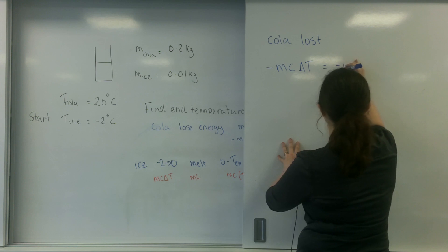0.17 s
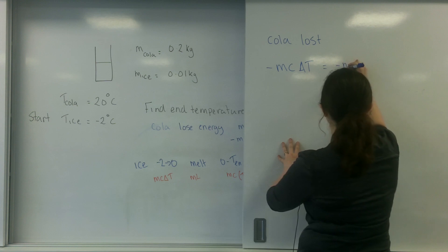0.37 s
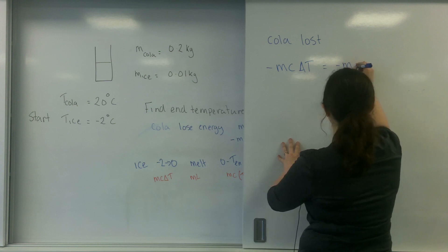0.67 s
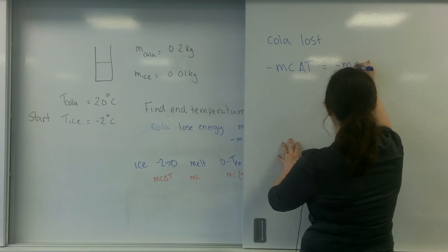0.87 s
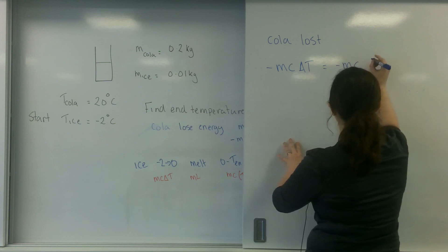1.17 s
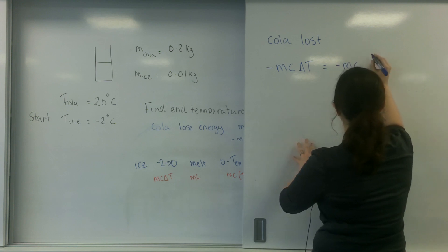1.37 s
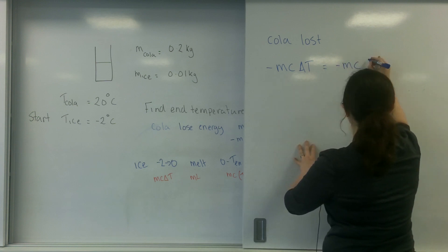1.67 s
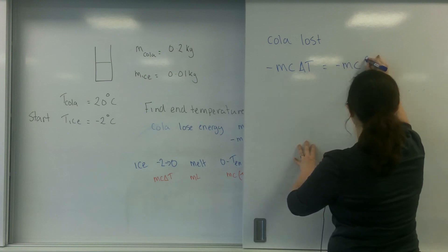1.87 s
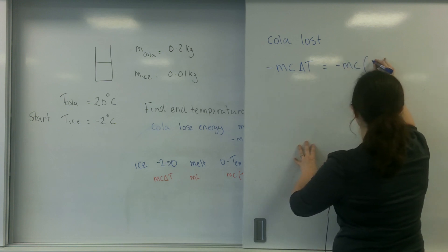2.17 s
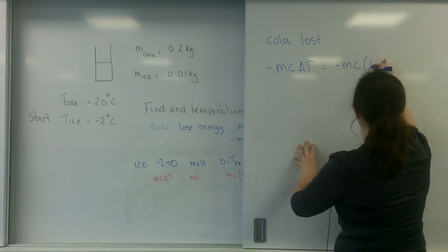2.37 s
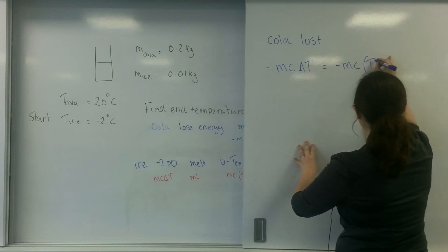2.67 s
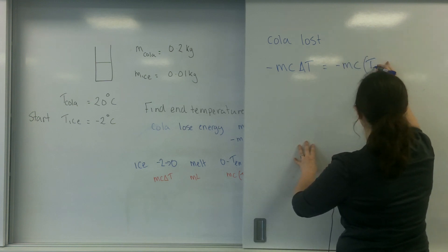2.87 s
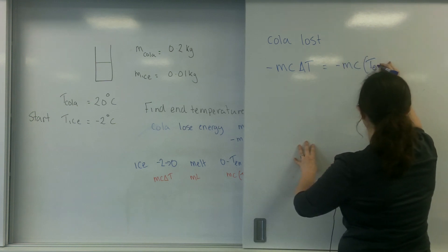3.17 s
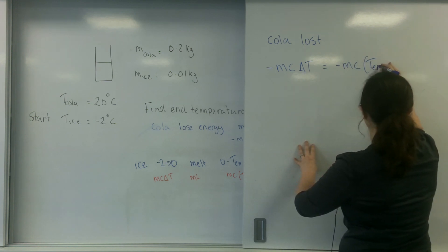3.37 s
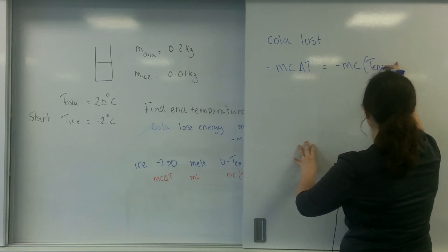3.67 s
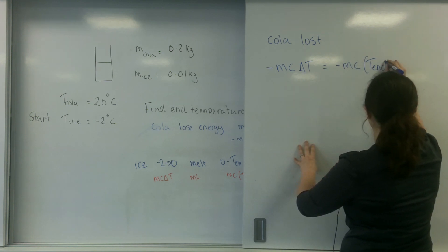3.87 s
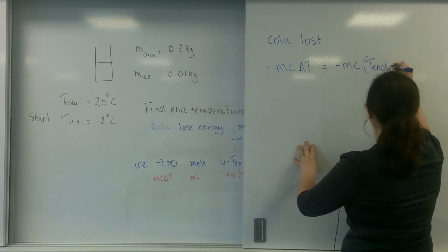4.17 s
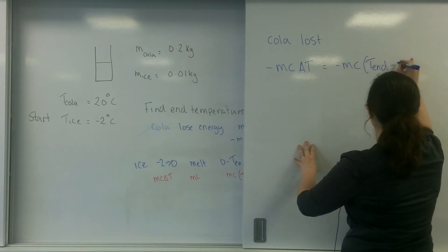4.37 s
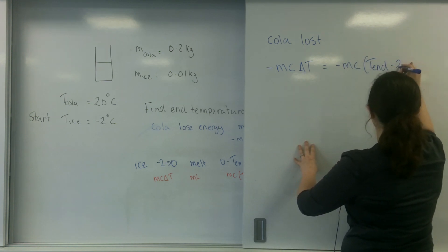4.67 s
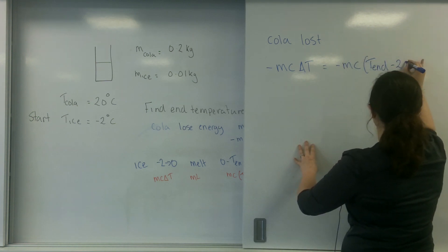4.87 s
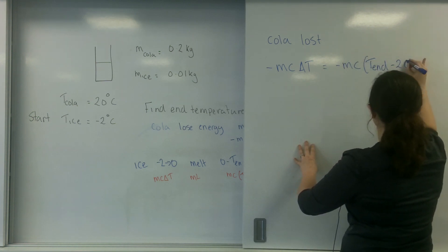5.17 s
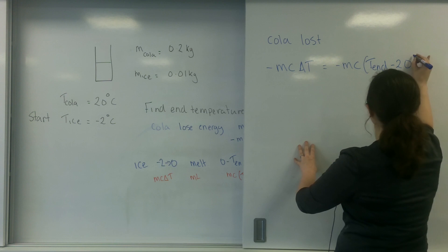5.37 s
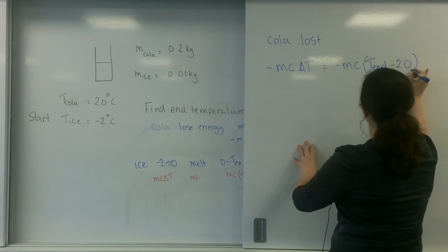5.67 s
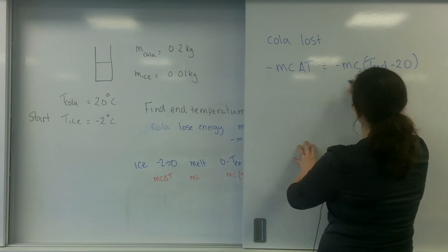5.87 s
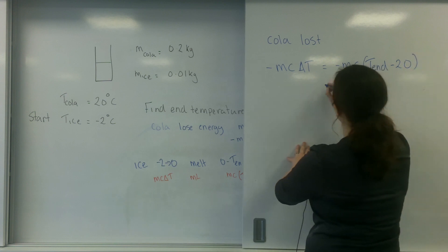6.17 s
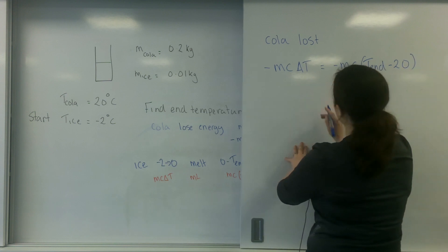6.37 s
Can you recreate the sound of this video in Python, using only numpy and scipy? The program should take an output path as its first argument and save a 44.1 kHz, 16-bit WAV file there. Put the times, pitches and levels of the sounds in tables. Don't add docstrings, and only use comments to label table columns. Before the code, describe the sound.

Stereo, two microphones: the left near the board hears light marker taps and dry, quick stroke hisses over faint ventilation and a distant hum; the right, pinned to clothing, hears muffled rustle and dull thuds. Writing pauses around one and a half seconds, continues until nearly six, then cloth rumbling and shoe scuffs dominate.

```python
import sys
import numpy as np
from scipy import signal
from scipy.fft import rfft, irfft, next_fast_len
from scipy.io import wavfile

SR = 44100
rng = np.random.default_rng(int(sys.argv[2]) if len(sys.argv) > 2 else 0)


def wav_out(sig):
    wavfile.write(sys.argv[1], SR, np.round(np.clip(np.atleast_2d(sig).T, -1, 1) * 32767).astype(np.int16))


def makeup_ratio(level_db):
    decades = np.asarray(level_db, float) / 20
    return 10 ** decades


N = 287664


def rms_one(x):
    return x / np.sqrt(np.mean(x ** 2) + 1e-20)


def in_time(rows):
    s, *columns = np.transpose(rows)
    return [np.interp(np.arange(N) / SR, s, c) for c in columns]


def at_hz(points, hz):
    point_hz, point_db = np.transpose(points)
    return np.interp(np.log(hz), np.log(point_hz), point_db)


def band_db(points, low_hz, high_hz):
    return 10 * np.log10(np.sum(makeup_ratio(at_hz(points, np.arange(low_hz, high_hz))) ** 2))


def drift(rate_hz):
    r = np.exp(-40 * np.pi * rate_hz / SR)
    noise = rng.standard_normal(N // 20 + 3002)
    slow = signal.lfilter([1], [1, -2 * r, r * r], noise)[3000:]
    return np.interp(np.arange(N) / 20, np.arange(len(slow)), rms_one(slow))


def clicks(times_s, sizes):
    out = np.full(N, 1e-18)
    index = np.round(np.array(times_s) * SR).astype(int)
    np.add.at(out, np.minimum(index, N - 1), sizes)
    return out


def ring(force, hz, t60_s):
    r, w = makeup_ratio(-60 / (t60_s * SR)), 2 * np.pi * hz / SR
    return signal.lfilter([0, np.sin(w)], [1, -2 * r * np.cos(w), r * r], force)


def rings(rows, cycles):
    out, t = np.zeros(N + 2000), np.arange(2000) / SR
    for s, db, hz in rows:
        start = round(s * SR)
        out[start:start + len(t)] += makeup_ratio(db - 60 * t * hz / cycles) * np.sin(2 * np.pi * hz * t)
    return out[:N]


def resonances(x, modes):
    out = 0
    for k, (hz, width_hz, level_db) in enumerate(modes):
        r = np.exp(-np.pi * width_hz / SR)
        top = (-1) ** k * makeup_ratio(level_db) * (1 - r * r) / 2
        poles = [1, -2 * r * np.cos(2 * np.pi * hz / SR), r * r]
        out = out + signal.lfilter([top, 0, -top], poles, x)
    return out


def bands(white):
    edges_hz = 7.8 * 2 ** np.arange(0, 11.1, .5)
    for k, (low, high) in enumerate(zip(edges_hz, edges_hz[1:])):
        sos = signal.butter(2, [low, high], "band", fs=SR, output="sos")
        yield np.sqrt(low * high), signal.sosfilt(sos, white[k % 2]) * np.sqrt(SR / 2)


def burst(times_s, peaks_db, low_hz, high_hz, t60_s):
    hits = clicks(times_s, makeup_ratio(np.array(peaks_db)))
    envelope = signal.lfilter([1], [1, -makeup_ratio(-60 / (t60_s * SR))], hits)
    sos = signal.butter(2, [low_hz, high_hz], "band", fs=SR, output="sos")
    return signal.sosfilt(sos, envelope * rng.standard_normal(N)) * np.sqrt(SR / 2 / (high_hz - low_hz))


def swells(rows, rest_db):
    t = np.arange(0, N + 64, 64) / SR
    power = np.full(len(t), makeup_ratio(rest_db) ** 2)
    for s, rise_ms, fall_ms, peak_db in rows:
        away = np.abs(t - s) * 1000 / np.where(t < s, rise_ms, fall_ms)
        power += makeup_ratio(peak_db - 10 * away ** 1.27) ** 2
    return np.interp(np.arange(N) / SR, t, 10 * np.log10(power))


# contact_s, blow_db, knock_brightness_db, middle_modes_lean_left_db
TAPS = [(0.085, -26, -14, 2), (0.34, -26, -12, 1.5), (1.031, -29, -17.5, 3), (2.041, -35.5, -37, 1),
        (2.483, -22, -15, -1), (2.7805, -22, -19.5, 1.5), (3.0805, -25, -19, 1), (3.456, -27, -16, 0.5),
        (3.894, -30.5, -23.5, 1.5), (4.4453, -24.5, -17.5, -2), (4.6818, -23.5, -18, -2),
        (5.145, -27.5, -15, -0.5), (5.6803, -29, -18.5, 2.5)]
# pitch_hz, t60_s, swing_left, swing_right [signed by side of the node line]
BOARD_MODES = [(144.3, 0.4, -0.025, -0.032), (156, 0.29, 0.107, 0.074), (197.8, 0.096, 1.16, 0.76),
               (202.6, 0.08, -1.63, -0.67), (239, 0.053, -0.48, -1.3), (256.4, 0.17, -0.1, 0.34),
               (285, 0.031, 0.29, 0.58), (336, 0.079, -0.045, 0.27), (405.7, 0.14, 0.29, 0.386),
               (409, 0.148, -0.16, -0.57), (463.3, 0.24, -0.031, 0.092), (519, 0.21, 0.1, -0.022),
               (623, 0.14, 0.12, 0.041), (620, 0.0062, 0.023, -0.25), (799, 0.11, -0.033, 0.073),
               (975, 0.027, 0.26, -0.041)]


def taps():
    trough_s, contact_s, shirt_lag_s = .0017, .00102, .0008
    bounce_s, bounce_db = 0.012, -5.5
    upper_at_shirt_db = 1.5
    s, blow_db, bright_db, lean_db = np.transpose(TAPS)
    start = s - trough_s
    pulse = np.hanning(round(contact_s * SR))
    spot_db = rng.normal(0, .6, (len(s), len(BOARD_MODES)))
    out = np.zeros((2, N))
    for k, (hz, t60_s, left, right) in enumerate(BOARD_MODES):
        hard_db = 1.4 * (bright_db + 14.5) * np.clip(np.log2(hz / 300), 0, 1)
        middle, upper = 270 < hz < 480, hz > 480
        sides_db = (middle * lean_db, (upper - middle) * lean_db + upper * upper_at_shirt_db)
        for side, swing in enumerate((left, right)):
            force = clicks(start, makeup_ratio(blow_db + hard_db + spot_db[:, k] + sides_db[side]))
            out[side] += swing * ring(force, hz, t60_s)
    out = signal.lfilter(pulse / pulse.sum(), [1], out)

    knock_db = blow_db + 1.7 * (bright_db + 15)
    twice_s = np.r_[start, start + bounce_s]
    twice_db = np.r_[knock_db, knock_db + bounce_db]
    for side, far_db in enumerate((0, -1.5)):
        out[side] += burst(start + 0.011, blow_db + far_db - 25.0, 250, 393, t60_s=0.26)
        out[side] += burst(start, knock_db + side * 3.9 - 24.0, 447, 753, t60_s=0.2)
        out[side] += burst(twice_s, twice_db + far_db - 28.5, 790, 1510, t60_s=0.087)
        out[side] += burst(twice_s, twice_db + far_db - 47, 1500, 4000, t60_s=.03)
        out[side] -= ring(clicks(twice_s + 0.00095, makeup_ratio(twice_db + far_db - 21)), 1070, t60_s=0.011)
        out[side] -= ring(clicks(start + .001, makeup_ratio(blow_db + far_db - 20)), 640, t60_s=0.021)
    out[1] = np.roll(out[1], round(shirt_lag_s * SR))
    return out


# full_speed_s, half_length_ms, hiss_db, lower_resonances_db
STROKES = [(.410, 21, -59, -2), (.516, 32, -61.5, 2.5), (0.627, 27, -66, 1), (.735, 32, -61, 1.5),
           (.845, 24, -64, 2.5), (1.120, 23, -55.5, -0.5), (1.200, 39, -67.5, 8), (2.197, 60, -60, -1),
           (2.53, 16, -68, 4), (2.565, 26, -66, -1), (2.837, 30, -58, 6.5), (3.144, 25, -63.5, 6),
           (3.25, 20, -63.5, 7.5), (3.333, 32, -68, 0), (3.505, 22, -61, -1), (3.616, 35, -60.5, -2),
           (3.713, 17, -62, -6.4), (3.912, 16, -65, 4), (3.95, 18, -57, -3), (4.012, 12, -64, 2),
           (4.045, 18, -50.5, -1), (4.095, 27, -62.5, 0), (4.237, 37, -60, -1.5), (4.479, 19, -62, 1),
           (4.716, 16, -60.5, 3), (4.79, 13, -64, 0), (4.823, 17.4, -51, -4.5), (4.86, 16, -58.5, 2),
           (4.922, 14, -55, 1), (5.224, 33, -63, -4.9), (5.320, 23, -49, -.5), (5.416, 39, -64, 3),
           (5.79, 20, -66, -3), (5.83, 22, -56.5, -6), (5.883, 21, -51.5, -7), (4.765, 17, -72, 1),
           (4.975, 26, -70, 6)]
# centre_hz, width_hz, level_db
FELT_LOW = [(3400, 1700, -6), (5900, 2000, -4), (7140, 1100, -1.5), (8870, 1600, 5.5)]
FELT_HIGH = [(9980, 1400, 5), (11130, 1100, 2.5), (11860, 860, 4.5), (13050, 1400, -2)]
# centre_hz, width_hz, removed_share_db
SHADOWS = [(4600, 500, -4), (9570, 680, -3)]
# start_s, peak_db, pitch_hz
LIFTS = [
    (2.483, -56, 4500),
    (2.4835, -59, 9000),
    (4.445, -59, 4500),
    (6.444, -53, 8500),
    (6.444, -50, 12000),
]
# start_s, peak_db, pitch_hz
SQUEAK = [
    (6.465, -58, 9200),
    (6.466, -55, 9800),
]


def strokes():
    t = np.arange(0, N + 32, 32) / SR
    low, high = np.zeros((2, len(t)))
    for s, half_ms, hiss_db, low_db in STROKES:
        speed = np.exp(-.55 * np.abs((t - s) * 1000 / half_ms) ** 2.44)
        high += speed * makeup_ratio(hiss_db - 4.5)
        low += speed * makeup_ratio(hiss_db + low_db - 6.0)
    low, high = in_time(np.transpose([t, low, high]))
    hiss = low * felt(FELT_LOW) + high * felt(FELT_HIGH)
    hiss = hiss - sum(resonances(hiss, [shadow]) for shadow in SHADOWS)
    return hiss + rings(LIFTS, cycles=14.0) + rings(SQUEAK, cycles=70.0)


def felt(modes):
    grip = rng.standard_normal(N) * makeup_ratio(2.6 * drift(60))
    out = 0
    for k, (hz, width_hz, level_db) in enumerate(modes):
        once = resonances(grip, [(hz, width_hz, 0)])
        sharp = (-1) ** k * resonances(once, [(hz, width_hz, level_db)])
        out = out + sharp * makeup_ratio(2.0 * drift(14))
    return rms_one(out)


# peak_s, rise_10db_ms, fall_10db_ms, rub_db,
# fibre_hiss_re_rub_db
SHIRT_RUBS = [(.0, 46, 122, -60, -8.5), (.19, 91, 100, -60, -13), (.25, 60, 60, -61, -4.5),
              (.32, 118, 62, -60, -26), (1.31, 500, 90, -63, -11), (1.50, 83, 177, -45.5, -9),
              (1.73, 155, 102, -47, -10), (1.80, 62, 64, -45.5, -10), (1.88, 114, 71, -41.5, -8),
              (2.02, 70, 116, -56.5, -7.5), (2.20, 165, 150, -56.5, -9), (2.35, 86, 70, -49, -11.5),
              (2.49, 70, 65, -56.5, -7), (2.74, 52, 42, -57, -10), (2.81, 71, 53, -55.5, -8.5),
              (3.05, 129, 197, -69.5, -15), (4.28, 120, 70, -67, -9), (4.69, 250, 250, -68, -14),
              (5.02, 62, 141, -58, -8.5), (5.19, 76, 78, -53.5, -10), (5.31, 94, 124, -53.5, -6.5),
              (5.42, 80, 60, -65, -11), (5.52, 43.7, 121, -54, -12), (5.62, 98, 120, -47.5, -11),
        (5.77, 64.6, 40, -49, -12.5), (5.839, 45, 103, -46, -6.5), (5.994, 24.6, 60, -41.5, -32),
        (6.029, 53, 77, -41.5, -4), (6.13, 60, 60, -47, -22), (6.19, 60, 60, -51.5, -5.5),
        (6.31, 75, 118, -45, -11), (6.432, 79.5, 45, -46, -8.5), (6.51, 40.4, 60, -52.5, -7)]
# peak_s, rise_10db_ms, fall_10db_ms, push_db
SHOVES = [(.07, 300, 35, -35.5), (.18, 36, 24, -37), (.32, 40, 30, -44), (.39, 21, 62, -38),
          (1.45, 45, 150, -43.5), (1.60, 130, 130, -40), (1.79, 160, 117, -31.5), (2.24, 222, 120, -43.5),
          (2.39, 70, 35, -37.5), (2.53, 54, 72, -41), (2.81, 140, 170, -43), (3.40, 400, 52, -52.5),
          (4.13, 600, 252, -51), (4.46, 80, 250, -51), (4.69, 300, 250, -50.5), (5.02, 95, 66, -45),
          (5.25, 110, 103, -39.5), (5.40, 150, 152, -44.5), (5.57, 61, 152, -31.5), (5.72, 152, 52, -30.5),
          (5.99, 77, 95, -28), (6.13, 43, 47, -25.5), (6.20, 80, 130, -28.5), (6.46, 200, 58, -32)]
# freq_hz, density_db_per_hz
CLOTH_COLOUR = [(13, -48), (36, -59), (60, -57), (100, -60.5), (200, -60.5), (400, -64), (650, -71),
                (1000, -74), (1600, -78), (2500, -81.5), (4000, -91), (6000, -88.5), (9000, -93),
                (12800, -96.5)]


def cloth():
    rest_rub_db, rest_push_db, rest_fibre_db = -70, -71.5, -76
    moves = SHIRT_RUBS
    rub_db = swells([row[:4] for row in moves], rest_rub_db)
    push_db = swells(SHOVES, rest_push_db)
    fibre_rows = [(s, rise, fall, db + fibre) for s, rise, fall, db, fibre in moves]
    hiss_db = swells(fibre_rows, rest_fibre_db)
    drag_db, level_db = hanging(), rub_db.copy()
    rub_db -= band_db(CLOTH_COLOUR, 1150, 4100)
    push_db -= band_db(CLOTH_COLOUR, 18.4, 98)
    hiss_db -= band_db(CLOTH_COLOUR, 6000, 13000)
    lumps_db = .7 * drift(25) + 1.6 * drift(120)
    out = 0
    for hz, noise in bands(rng.standard_normal((2, N))):
        pushed = np.clip(np.log2(330 / hz) / 3.4, 0, 1)
        hissed = np.clip(np.log2(hz / 3500) / 1.18, 0, 1)
        drive_db = rub_db + pushed * (push_db - rub_db) + hissed * (hiss_db - rub_db)
        drive_db += drag_db * np.clip(1.3 - abs(np.log2(hz / 250)), 0, 1)
        grain_db = (1 - pushed) * ((1 - 0.34 * hissed) * lumps_db + 0.6 * drift(16.0))
        out = out + noise * makeup_ratio(at_hz(CLOTH_COLOUR, hz) + drive_db + grain_db - 2.0)
    return out + snags() + threads(level_db) + thuds()


# centre_s, half_length_ms, extra_250hz_db
HANGS = [
    (.45, 280, 6),
    (1.40, 40, 1.5),
    (1.84, 97, 4),
    (2.70, 300, 4),
    (5.20, 130, 3.5),
    (5.68, 75, 2.5),
    (6.22, 130, 3.5),
]


def hanging():
    t = np.arange(0, N + 64, 64) / SR
    loose_db = -2.5
    weight_db = loose_db + sum(db * np.exp(-((t - s) * 1000 / half_ms) ** 2) for s, half_ms, db in HANGS)
    return np.interp(np.arange(N) / SR, t, weight_db)


# start_s, peak_db
SNAGS = [(.144, -40), (.273, -37), (.310, -37), (1.279, -43), (1.398, -43), (1.602, -33), (1.625, -34),
         (2.067, -42), (2.308, -35), (3.320, -56), (3.348, -54), (3.385, -51), (3.404, -55), (3.578, -53),
         (4.250, -40), (4.343, -49), (4.809, -50), (4.972, -40), (5.499, -36), (5.776, -32), (5.938, -38),
         (5.985, -36), (6.249, -28), (6.484, -31)]
# start_s, peak_db
FIBRES = [(.168, -55), (.276, -61), (2.066, -51), (2.475, -51), (2.518, -49), (2.632, -60), (2.686, -57),
          (4.096, -59), (5.11, -58), (2.994, -53), (3.147, -58), (3.347, -68), (3.416, -65), (5.562, -47),
          (6.131, -40)]


def snags():
    s, peak_db = np.transpose(SNAGS)
    jerk = clicks(s, -makeup_ratio(peak_db + 6))
    rung = ring(jerk, 480, t60_s=.009) + ring(jerk, 1500, t60_s=.005) * makeup_ratio(-4)
    scratch = burst(s, peak_db - 9, 150, 2200, t60_s=.05)
    padded = signal.lfilter([.16], [1, -.84], rung + scratch)
    return padded + burst(*np.transpose(FIBRES), 5100, 8300, t60_s=0.0064)


# start_s, peak_db, pitch_hz
PLUCKS = [(0.168, -46, 1500), (.1680, -55, 3100), (.2760, -53, 3200), (.3100, -48.5, 2580),
          (3.2920, -55, 3000), (3.3195, -51, 2100), (3.3475, -49, 2200), (3.347, -48, 4500),
          (3.3810, -49, 1200), (3.404, -46, 2100), (3.4160, -52, 4500), (5.525, -32, 1680),
          (5.533, -30.5, 1650), (5.541, -36, 1730), (.927, -57, 1500), (1.097, -51, 1400),
          (1.323, -52, 1500), (2.326, -34, 1200), (2.543, -46, 1700), (2.63, -46, 2000), (5.402, -45, 1150),
          (5.835, -42, 1490), (6.201, -35, 1390), (6.305, -29.5, 1280), (5.9370, -38, 3000)]


def threads(rub_db):
    catches_per_s, catches_re_rub_db = 260, -9
    sizes = makeup_ratio(4.4 * np.minimum(rng.exponential(1, N), 4)) * rng.choice([-1, 1], N)
    caught = rng.random(N) < catches_per_s * makeup_ratio(6.0 * drift(12)) / SR
    dealt = rng.integers(0, 12, N)
    catches = 0
    for k, hz in enumerate(np.geomspace(300, 3200, 12)):
        catches = catches + ring(sizes * caught * (dealt == k) + 1e-18, hz, 10.0 / hz)
    return rings(PLUCKS, cycles=14) + rms_one(catches) * makeup_ratio(rub_db + catches_re_rub_db + 6)


# peak_s, level_db, pitch_hz
THUDS = [(1.431, -34, 360), (1.461, -37, 316), (1.504, -35, 316), (1.525, -35, 314), (1.753, -28.5, 245),
         (1.786, -29.5, 267), (1.807, -25, 196), (1.837, -29, 269), (1.86, -26, 263), (1.878, -29, 255),
         (1.918, -30, 296), (2.016, -40.5, 376), (2.043, -46, 250), (2.133, -42, 258), (2.15, -38.5, 219),
         (2.277, -38, 199), (2.344, -32.5, 270), (2.373, -37.6, 181), (2.748, -38.5, 324), (4.98, -43, 312),
         (5.18, -38, 274), (5.203, -34, 233), (5.217, -36, 247), (5.311, -35, 312), (5.335, -50, 269),
         (5.501, -44, 349), (5.524, -35, 194), (5.604, -32.5, 338), (5.62, -30, 253), (5.684, -29.1, 350),
         (5.713, -33, 177), (5.852, -35, 324), (5.869, -36, 283), (5.987, -29, 231), (6.036, -28, 310),
         (6.141, -35, 226), (6.177, -32, 349), (6.198, -27.5, 344), (6.249, -34, 269), (6.267, -33, 478),
         (6.301, -31.5, 339), (6.347, -30, 281), (6.382, -32.5, 456), (6.44, -33, 454)]


def thuds():
    rise_s, fall_s, thud_db, scratch_db = .004, 0.0061, -1.5, -16
    out, t = np.zeros(N + 4000), np.arange(-800, 2400) / SR
    shape = np.exp(-np.where(t < 0, (t / rise_s) ** 2, np.abs(t / fall_s) ** 1.6))
    for (s, db, hz), (turn, over) in zip(THUDS, rng.random((len(THUDS), 2))):
        phase = 2 * np.pi * (hz * t + turn)
        wave = np.sin(phase) + 0.38 * np.sin((1.493 + over) * phase)
        start = round(s * SR) - 800
        out[start:start + len(t)] += makeup_ratio(db + thud_db) * shape * wave
    s, db, _ = np.transpose(THUDS)
    return out[:N] + burst(s - rise_s, db + scratch_db, 500, 2040, t60_s=0.043)


# peak_s, rise_10db_ms, fall_10db_ms, level_db
SLIDES = [
    (5.55, 65, 130, -62),
    (5.99, 352, 200, -67),
    (6.12, 60, 110, -71),
    (6.51, 40, 50, -60),
]
# centre_hz, width_hz, level_db
SOLE = [(251, 270, 6), (600, 410, 5), (1930, 390, 1.5), (2430, 740, -4), (4250, 2000, -15)]
# start_s, peak_db
STEPS = [
    (5.524, -37),
    (5.972, -42),
    (6.128, -62),
    (6.437, -62),
]


def shoes():
    slide_db = swells(SLIDES, -120)
    rub = rms_one(resonances(rng.standard_normal(N), SOLE))
    slide = rub * makeup_ratio(slide_db + 7 + 1.5 * drift(30))
    s, peak_db = np.transpose(STEPS)
    heel = burst(s, peak_db - 13, 120, 1100, t60_s=0.086) + burst(s, peak_db - 16, 1100, 3800, t60_s=0.11)
    return slide + heel


# time_s, load_db
MACHINE = [
    (0, -63),
    (.6, -75),
    (1.6, -92),
    (2.2, -74.5),
    (6.52, -81),
]


def ducts():
    upper_db, upper_fade_db_per_s = -7.5, -1
    air, (low_db,) = rng.standard_normal(N), in_time(MACHINE)
    high_db = low_db + upper_db + upper_fade_db_per_s * np.arange(N) / SR
    low = rms_one(resonances(air, [(600, 63, 0)]))
    high = rms_one(resonances(air, [(960, 45, 0)]))
    return low * makeup_ratio(low_db) + high * makeup_ratio(high_db)


# freq_hz, density_db_per_hz
FLOOR_LEFT = [(25, -81.5), (50, -72), (100, -97), (200, -88.5), (400, -101), (650, -100.4), (1000, -102.7),
              (1600, -108.7), (2500, -112.1), (4000, -113.7), (6000, -115.1), (9000, -117.2),
              (12800, -119.0)]
FLOOR_RIGHT = [(25, -68), (50, -76), (100, -76), (200, -82), (400, -104.5), (650, -103.5), (1000, -103),
               (1600, -101.0), (2500, -103.7), (4000, -109.2), (6000, -112.0), (9000, -114.5),
               (12800, -116.7)]


def floor():
    out = 0
    for hz, noise in bands(rng.standard_normal((2, 2, N))):
        wander_db = np.clip(np.log2(500 / hz), 0, 2.5) * drift(1.7)
        level_db = np.array([[at_hz(FLOOR_LEFT, hz)], [at_hz(FLOOR_RIGHT, hz) - 3]])
        out = out + noise * makeup_ratio(level_db + wander_db)
    return out


def room(x):
    t60_s, wall_cut_hz = 0.65, 8200
    size = next_fast_len(N + SR)
    w = 2 * np.pi * np.arange(size // 2 + 1) / size
    dull = np.exp(-2 * np.pi * wall_cut_hz / SR)
    wall = (1 - dull) / (1 - dull * np.exp(-1j * w))
    response = np.zeros((2, len(w)), complex)
    for k, lag in enumerate(rng.uniform(0.013, .045, 16) * SR):
        loop = makeup_ratio(-60 * lag / SR / t60_s) * wall * np.exp(-1j * w * lag)
        response[k % 2] += (-1) ** (k // 2) * loop / (1 - loop)
    return irfft(response * rfft(x, size), size)[:, :N]


def scene():
    knock, hiss, feet = taps(), strokes(), shoes()
    out = knock + floor() + room(knock[0] + feet) * makeup_ratio(np.array([[-24], [-21]]))
    out += feet * makeup_ratio(np.array([[0], [-3]]))
    out[0] += hiss + ducts()
    out[1] += cloth() + np.roll(hiss, 60) * makeup_ratio(-39)
    return out


def top_cut(x):
    return signal.sosfilt(signal.butter(12, 14210, fs=SR, output="sos"), x)


def record(dry):
    low_pass = signal.ellip(10, .5, 60, 13920, fs=SR, output="sos")
    mix = signal.sosfilt(low_pass, dry)
    return top_cut(mix)


dry = scene()
out = record(dry)
wav_out(out)
```